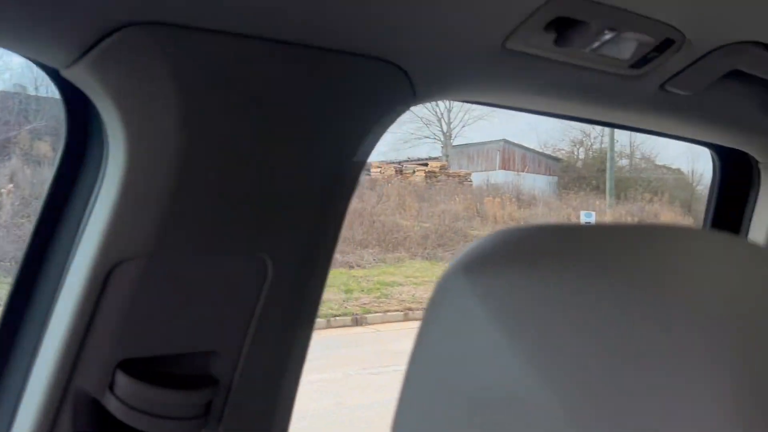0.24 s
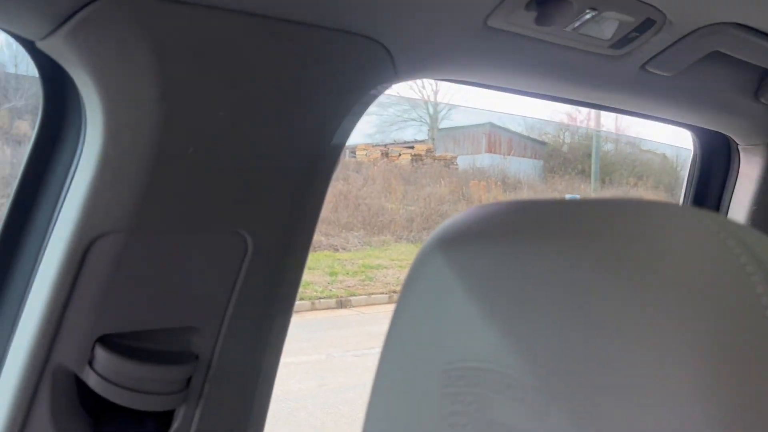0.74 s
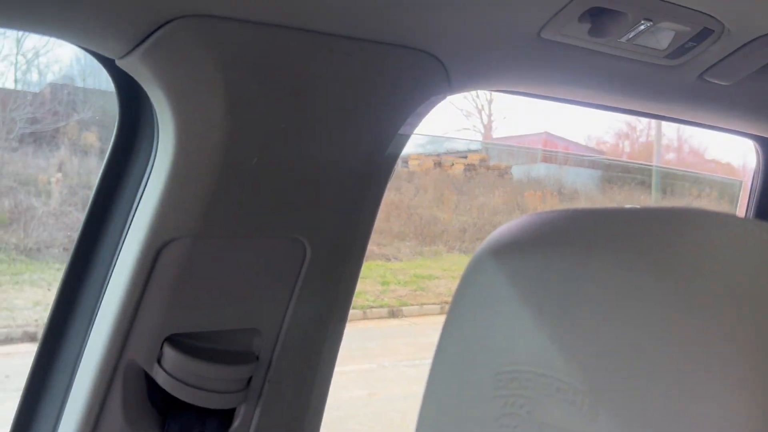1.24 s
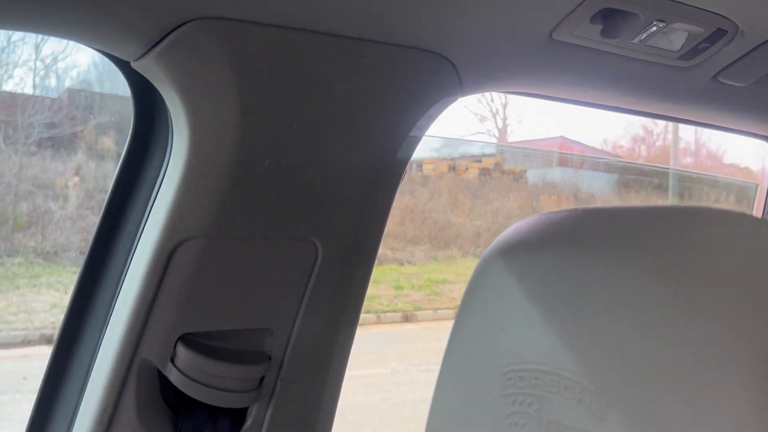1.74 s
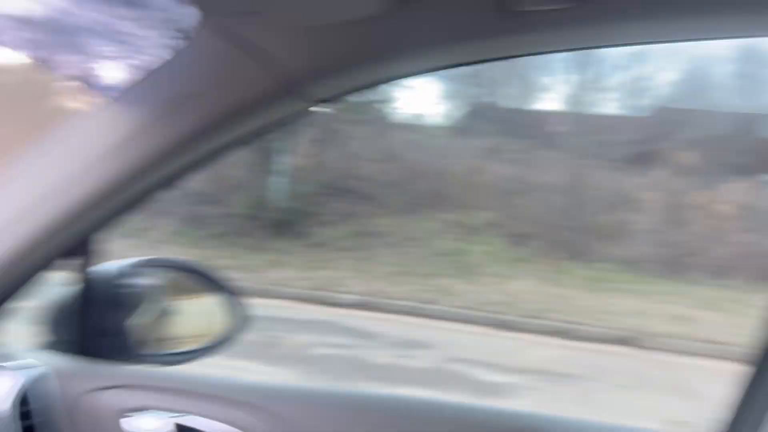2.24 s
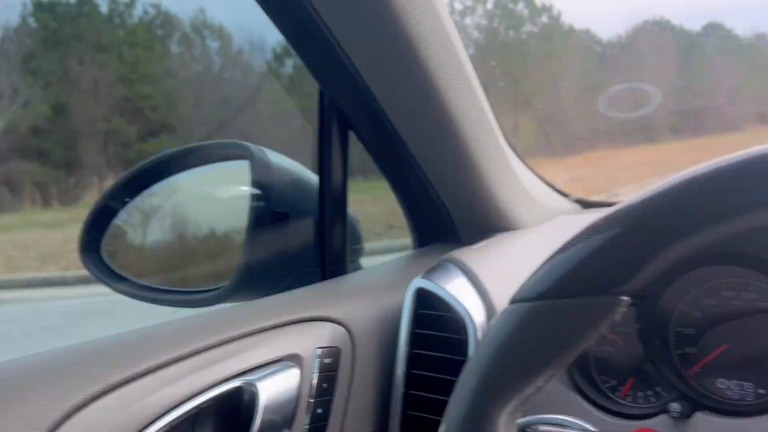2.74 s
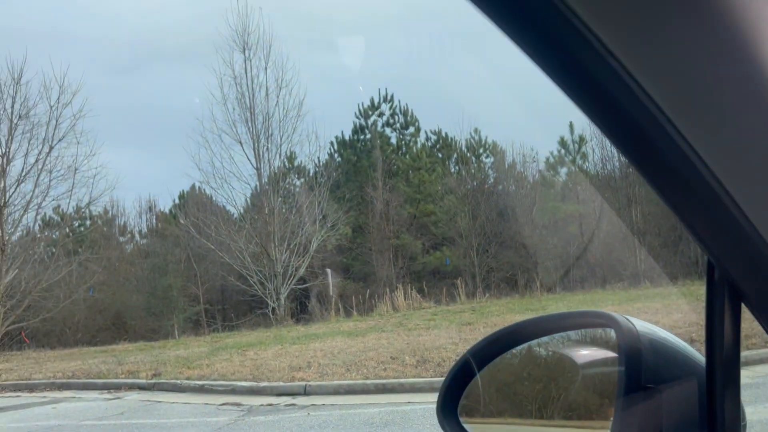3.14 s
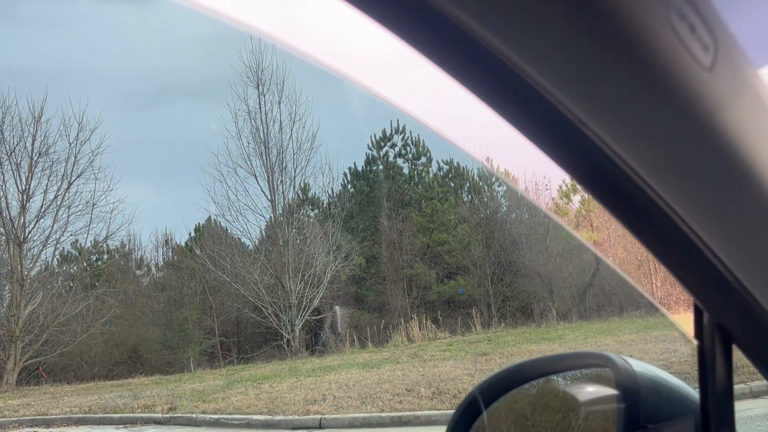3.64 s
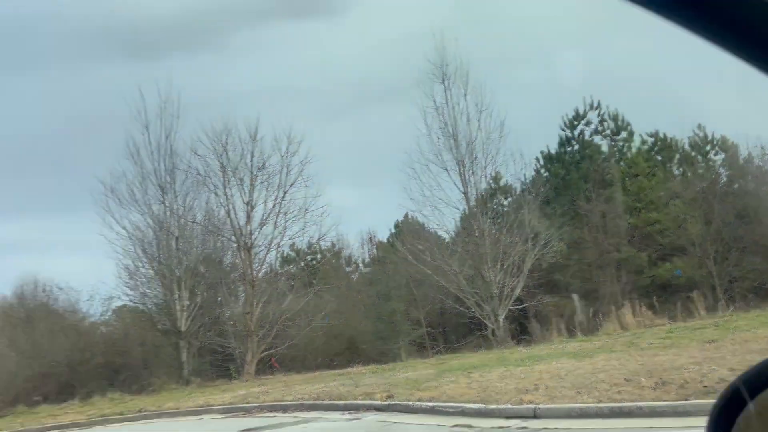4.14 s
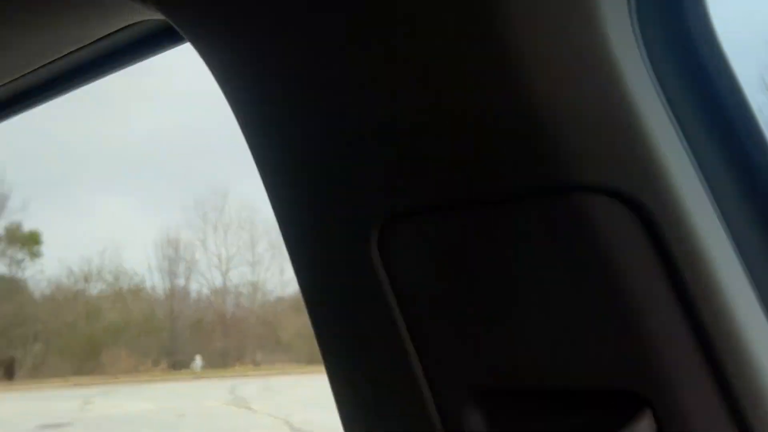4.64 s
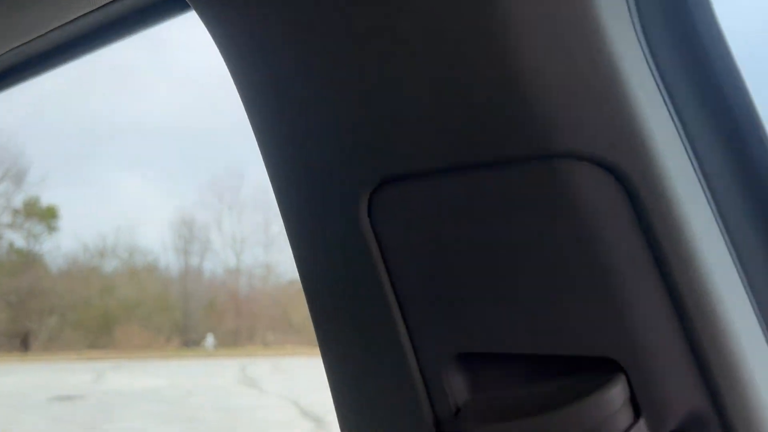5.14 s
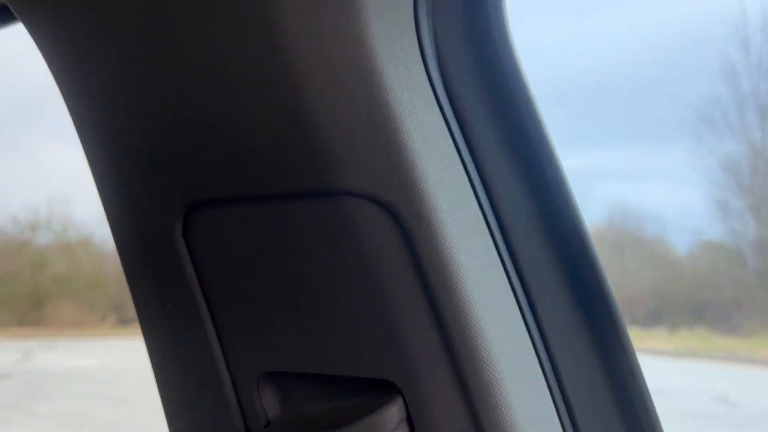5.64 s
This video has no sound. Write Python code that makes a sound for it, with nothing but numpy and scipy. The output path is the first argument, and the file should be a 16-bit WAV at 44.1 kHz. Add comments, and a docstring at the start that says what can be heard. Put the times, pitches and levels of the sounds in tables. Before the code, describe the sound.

Short motor whines of power windows, glass rubbing in seals, thumping door panels and crisp plastic clicks in a softly humming, close car cabin.

```python
"""Inside a parked, idling car the electric windows run in five short bursts, three at the back, then two at the front.
Each burst is a motor whine made of sine waves, under the noise hiss of glass sliding in its seals.
The doors knock and crack, and rocker switches click: short noise bursts mixed with dying sine waves.
Behind them are wavering engine tones, low rumble, faint air and clothes rubbing as a person shifts in the seat.
Gliding tones add thin whistles, squeaks and creaks; bands of grainy noise add rustles and breathy hisses."""
import sys
import numpy as np
from scipy import signal
from scipy.fft import rfft, irfft, next_fast_len
from scipy.io import wavfile
from scipy.ndimage import uniform_filter1d

SR = 44100
rng = np.random.default_rng(int(sys.argv[2]) if len(sys.argv) > 2 else 0)


def inscribe(sig):
    """Save sig as 16-bit PCM at rate SR to the path in sys.argv[1].

    A 1-D sig is mono; a 2-D sig holds one channel per row.
    Samples are clipped to [-1, 1] before scaling.
    """
    pcm = np.round(np.clip(np.atleast_2d(sig).T, -1, 1) * 32767)
    wavfile.write(sys.argv[1], SR, pcm.astype(np.int16))


N = 259308
TIME = np.arange(N) / SR  # seconds, whole scene
RING = np.arange(16384) / SR  # seconds, one hit
# likeness of left and right channel by pitch: pitch_hz, likeness (1 = the same)
CHANNEL_LIKENESS = [(60, .99), (130, .96), (300, .78), (650, .2), (1400, .12), (3100, .28), (6800, .3),
                    (9000, .75), (10200, .9), (13000, .5), (16000, .15)]
# phase of right against left, opposed near 10 kHz: pitch_hz, phase_radians
CHANNEL_PHASE = [(60, 0), (6500, 0), (9200, 2.2), (10200, np.pi), (11000, 5), (12200, 2 * np.pi),
                 (16000, 7)]


def gain_of(db):
    """Decibels to amplitude."""
    return 10 ** (np.asarray(db) / 20)


def evened(x):
    """Scales to rms 1."""
    return x / np.sqrt(np.mean(x ** 2) + 1e-20)


def struck(x):
    """Scales a hit to rms 1 over its first 20 ms."""
    return x / np.sqrt(np.mean(x[..., :SR // 50] ** 2) + 1e-20)


def read(points, hz):
    """Reads a table on a log-frequency axis."""
    f, value = np.transpose(points)
    return np.interp(np.log(hz + 1), np.log(f + 1), value)


def follow(rows):
    """A time curve at every sample."""
    return np.interp(TIME, *np.transpose(rows))


def add(mix, s, sound):
    """Adds a sound at time s."""
    part = mix[:, max(round(s * SR), 0):][:, :sound.shape[-1]]
    part += sound[..., :part.shape[-1]]


def wander(rate_hz):
    """Random wavering of rms 1, mostly slower than the given rate."""
    hz = np.fft.rfftfreq(N, 1 / SR)
    spectrum = rfft(rng.standard_normal(N)) * np.exp(-(hz / rate_hz) ** 2)
    return evened(irfft(spectrum, N))


def gate(start, end, fade):
    """On between two times, with short fades."""
    return np.clip(np.minimum(TIME - start, end - TIME) / fade + .5, 0, 1)


def arch(middle, length):
    """One smooth rise and fall."""
    return np.cos(np.pi * np.clip((TIME - middle) / length, -.5, .5))


def swells(rows):
    """Amplitude of a series of movements, each one arch."""
    return sum(gain_of(db) * arch(middle, length) for middle, length, db in rows)


def noise(spectrum, size=N):
    """Coloured noise in two channels, whose likeness and phase depend on the pitch."""
    length = next_fast_len(size)
    hz = np.fft.rfftfreq(length, 1 / SR)
    left, other = rfft(rng.standard_normal((2, length)))
    same = np.clip(read(CHANNEL_LIKENESS, hz), -1, 1)
    right = same * left + np.sqrt(1 - same ** 2) * other
    right = right * np.exp(1j * read(CHANNEL_PHASE, hz))
    coloured = np.array([left, right]) * gain_of(read(spectrum, hz))
    return evened(irfft(coloured, length)[:, :size])


def dying(t60):
    """Exponential decay that falls by 60 dB in t60 seconds."""
    return np.exp(-np.log(1000) * RING / max(t60, 1e-3))


def partial(hz):
    """A sine with a different phase in the two channels, partly by chance."""
    spread = np.arccos(np.clip(read(CHANNEL_LIKENESS, hz), -1, 1))
    apart = spread * rng.uniform(-1.04, 1) + read(CHANNEL_PHASE, hz)
    return np.sin(2 * np.pi * hz * RING + np.array([[0], [apart]]))


def mode(hz, t60):
    """The one mode (ringing tone) that a blow excites most."""
    return struck(dying(t60) * (1 - np.exp(-RING * hz / 2)) * partial(hz))


def ring(modes, detune):
    """Damped modes; each blow lands elsewhere and shifts their pitches a little."""
    out = 0
    for k, (hz, db, t60) in enumerate(modes):
        tone = partial(hz * (1 + detune * rng.standard_normal()))
        out = out + (-1) ** k * gain_of(db) * dying(t60) * (1 - np.exp(-RING * hz * 2)) * tone
    return out


def burst(spectrum, rise, t60, tail_db, tail_t60, chatter_db):
    """Many close modes die together, shaken by small rebounds; then the short tail of the upholstered cabin."""
    rebounds = evened(uniform_filter1d(rng.standard_normal(len(RING)), size=140))
    body = dying(t60) * gain_of(chatter_db * rebounds)
    tail = gain_of(tail_db) * dying(tail_t60)
    shape = (1 - np.exp(-RING / rise)) * (body + tail)
    return struck(noise(spectrum, size=len(RING)) * shape)


def bent(x):
    """Bending waves carry the treble first, so a knock falls quickly in pitch."""
    longest_lag_s, fade_hz = 0.00694, 408  # the lag shrinks as the pitch rises
    hz = np.fft.rfftfreq(len(RING), 1 / SR)
    lag = longest_lag_s * np.exp(-hz / fade_hz)
    return irfft(rfft(x) * np.exp(-2j * np.pi * np.cumsum(lag) * hz[1]), len(RING))


def cabin(rumble_db, jolt_db, air_db, cloth_db, grain_db):
    """Low rumble, faint air, and the grainy rub of clothes on the seat."""
    # rumble of the car and the hand-held microphone: time_s, level_db before rumble_db
    rumble_curve = [(0.0, -40.5), (0.31, -34.5), (0.7, -42.5), (1.33, -47), (1.8, -41), (2.9, -40),
                    (3.24, -35), (3.67, -38.5), (4.21, -34), (4.75, -40.5), (5.32, -48.5), (5.44, -41.5),
                    (5.88, -35)]
    # its colour: pitch_hz, density_db (per Hz)
    rumble_colour = [(15, -53), (28, -12), (40, 10.5), (55, -4.5), (85, -2.5), (130, -5), (200, -19),
                     (300, -31.5), (500, -27), (1000, -60)]
    # the microphone is jolted as it swings round: middle_s, length_s, level_db before jolt_db
    jolts = [(0.42, 0.33, -34), (2.3, 0.13, -30.5), (2.66, 0.29, -28), (3.23, 0.19, -23), (4.38, 0.36, -36),
             (5.25, 0.5, -29.5)]
    # clothes and seat rubbing: middle_s, length_s, level_db before cloth_db
    shifts = [(2.67, 0.13, -51.5), (3.0, 0.89, -49), (3.68, 0.53, -59), (4.44, 0.58, -52.5),
              (5.15, 0.12, -38), (5.64, 0.22, -44.5), (5.88, 0.17, -37.5)]
    # colours of cloth and air: pitch_hz, density_db (per Hz)
    cloth_colour = [(120, -55.5), (200, 0.5), (366, -11.5), (424, -20), (465, -31), (659, -19), (1650, -25),
                    (8270, -40), (10100, -52), (12200, -46), (16000, -58)]
    air_colour = [(100, -11.5), (170, -1), (300, -5.5), (480, -20.5), (700, -21.5), (900, -22),
                  (1500, -29.5), (2900, -33), (4000, -50), (8000, -47.5), (16000, -137)]
    rumble_level = np.hypot(gain_of(follow(rumble_curve) + rumble_db), gain_of(jolt_db) * swells(jolts))
    rumble = noise(rumble_colour) * rumble_level
    cloth = noise(cloth_colour) * swells(shifts) * gain_of(cloth_db + grain_db * wander(150))
    air = noise(air_colour) * gain_of(-63.5 + air_db)
    return rumble + cloth + air


def idle(drone_db, drift, low_share, drone_share, octave_share):
    """Steady, slightly wavering engine tones that swell as the microphone moves about the cabin."""
    # idling engine: pitch_hz, level_db (rms, before the swells and drone_db)
    engine_tones = [(38.5, -51.5), (80.7, -74.5), (145.3, -45), (290.7, -56.5)]
    # standing waves met on the way (only changes around the mean count): time_s, drone_db, octave_db
    standing_waves = [(0.0, -49, -58.5), (0.33, -46.5, -58), (1.0, -45, -57.5), (1.85, -45, -56.5),
                      (2.289, -48, -56.5), (2.64, -44.5, -43.5), (3.16, -37, -69), (4.09, -45.5, -52),
                      (4.42, -42.5, -59), (4.81, -50, -57), (5.65, -45, -54.5), (5.88, -51, -55)]
    s, drone, octave = np.transpose(standing_waves)
    places = [(drone, low_share), (drone, low_share), (drone, drone_share), (octave, octave_share)]
    tones = np.zeros(N)
    for (hz, db), (place_db, share) in zip(engine_tones, places):
        swell_db = share * np.interp(TIME, s, place_db - place_db.mean()) + 1.2 * wander(4)
        pitch = hz * (1 + drift * wander(5.01))
        tones += gain_of(db + swell_db) * np.sin(2 * np.pi * np.cumsum(pitch) / SR)
    return np.sqrt(2) * tones * gain_of(drone_db)  # root 2 turns rms into sine peak


def gliding_tones(level_db):
    """Brief gliding tones with a ragged pitch: thin breathy whistles, squeaks and low creaks."""
    # middle_s, length_s, pitch_hz, glide (share of pitch), level_db before the layer gain,
    # roughness (share of pitch)
    tone_rows = [(1.583, 0.08, 2330, 0.06, -55, 0.05), (1.575, 0.115, 3650, 0.09, -69, 0.045),
                 (1.712, 0.19, 2600, -0.022, -68, 0.028), (2.68, 0.1, 450, 0.045, -45.5, 0.012),
                 (3.45, 0.044, 2720, -0.11, -39, 0.084), (3.484, 0.039, 1435, 0.029, -42.5, 0.024),
                 (3.725, 0.092, 968, -0.17, -53, 0.11), (5.429, 0.1, 289.3, 0.15, -45, 0.058),
                 (5.6, 0.039, 354.3, -0.14, -39, 0.036), (5.668, 0.21, 363, -0.034, -46.5, 0.07),
                 (5.668, 0.11, 170, 0.27, -28.5, 0.03), (5.57, 0.162, 1300, 0.1, -64, 0.04),
                 (5.62, 0.14, 1850, -0.083, -65, 0.04)]
    out = np.zeros(N)
    for middle, length, hz, glide, db, rough in tone_rows:
        slide = glide * np.clip((TIME - middle) / length, -.5, .5)
        pitch = hz * (1 + slide + rough * wander(hz / 4))
        level = arch(middle, length) * gain_of(db + 0.61 * wander(90))
        out += level * np.sin(2 * np.pi * np.cumsum(pitch) / SR)
    return gain_of(level_db) * out


def rustles(level_db, grain_db):
    """Dry rustles and faint breathy hisses: grainy noise in bands of different pitch and width."""
    # middle_s, length_s, centre_hz, half_width_octaves, level_db before the layer gain
    rustle_rows = [(0.384, 0.31, 3480, 0.63, -54.5), (1.042, 0.13, 4430, 0.45, -66),
                   (1.45, 0.11, 5260, 0.5, -66.5), (1.642, 0.26, 2270, 0.12, -59.5),
                   (1.879, 0.14, 2480, 1, -54), (3.051, 0.034, 2000, 0.98, -40),
                   (3.84, 0.1, 2480, 0.64, -51), (4.169, 0.085, 1650, 0.79, -41),
                   (5.09, 0.06, 2580, 0.25, -61), (5.253, 0.13, 2190, 0.65, -58),
                   (5.49, 0.17, 1900, 0.24, -67), (5.14, 0.12, 1400, 0.4, -50),
                   (5.55, 0.15, 970, 0.92, -53.5), (5.567, 0.25, 430, 0.3, -50.5)]
    out = np.zeros((2, N))
    for middle, length, hz, octaves, db in rustle_rows:
        band = [(hz * 2 ** (k * octaves), -7 * abs(k) ** 1.3) for k in range(-5, 6)]
        out += noise(band) * arch(middle, length) * gain_of(db)
    return out * gain_of(level_db + grain_db * wander(250))


def cracks(level_db, ringing):
    """Door trim lets go with single dry cracks as the load comes on or off, each with a short ring."""
    # start_s, centre_hz, level_db before the layer gain
    crack_rows = [(0.278, 3000, -47), (0.284, 2290, -44), (0.359, 2500, -46), (0.402, 2610, -43),
                  (0.427, 1550, -37.5), (1.805, 2930, -54), (1.834, 1980, -49), (1.861, 3020, -46),
                  (1.89, 2900, -45), (1.896, 2650, -46.5), (3.054, 2574, -31), (3.153, 2740, -39),
                  (3.815, 2780, -39), (3.839, 3080, -37.5), (3.873, 2170, -38), (3.888, 2388, -45),
                  (4.277, 1530, -36), (4.285, 2710, -37.5), (4.395, 2390, -48), (5.144, 1420, -40.5),
                  (5.712, 3980, -59)]
    # colour of a crack: multiple of the centre, density_db (per Hz)
    crack_band = [(0.15, -30), (0.4, -11), (0.75, -2), (1, -1), (1.3, -13.5), (2.2, -22.5), (4, -37.5),
                  (6, -51.5)]
    out = np.zeros((2, N))
    for s, hz, db in crack_rows:
        band = [(hz * ratio, band_db) for ratio, band_db in crack_band]
        crack = burst(band, rise=0.00037, t60=0.024, tail_db=-20, tail_t60=0.067, chatter_db=1.5)
        add(out, s, gain_of(db + level_db) * struck(crack + ringing * mode(hz, t60=0.042)))
    return out


def latch():
    """A small steel catch snaps after the front glass stops and rings briefly in clear bands."""
    # its ringing tones: pitch_hz, level_db (relative), t60_s
    catch_modes = [(1390, 1, 0.044), (1664, 9, 0.04), (1754, 6, 0.061), (2050, 4.5, 0.058),
                   (2470, -1, 0.057), (3180, -9.5, 0.07), (3910, -3.5, 0.07), (4230, 0.5, 0.091),
                   (4890, 1.5, 0.075), (4950, 3.5, 0.09), (5850, -5.5, 0.12), (6150, -8.5, 0.12),
                   (8200, -2, 0.08), (8300, 0, 0.1)]
    start_s, level_db = 4.344, -34
    out = np.zeros((2, N))
    add(out, start_s, gain_of(level_db) * struck(ring(catch_modes, detune=0.005)))
    return out


def clicks(snap_db, body_db, fizz_db, modal, leading, springy):
    """A spring snaps over and rings its plastic housing."""
    # switch clicks: start_s, snap_db, hollow_body_db (both before the layer gains), strongest_body_hz
    click_rows = [(0.331, -46.5, -41.5, 764), (0.78, -46.5, -47, 760), (1.1707, -53, -44, 1025),
                  (1.508, -65, -49.5, 1112), (1.518, -56, -57, 2090), (1.6456, -48, -39.5, 1033),
                  (1.805, -48, -44.5, 1020), (2.801, -45.5, -46.5, 1400), (2.8258, -47, -45, 1270),
                  (2.8414, -43, -42.5, 1110), (2.8718, -28.5, -31, 916), (2.962, -43, -44.5, 960),
                  (3.065, -47, -42, 1440), (3.5361, -29.5, -28, 1180), (3.5805, -46, -39, 976),
                  (3.6042, -27, -26, 1460), (3.653, -55, -38.5, 1120), (3.714, -50.5, -38, 976),
                  (3.797, -47, -41, 1065), (4.3445, -24, -33, 1674), (4.4367, -53, -45, 987),
                  (4.7026, -36.5, -37, 993), (5.102, -43, -39, 1150), (5.2779, -35, -34.5, 977),
                  (5.3098, -40.5, -39, 980), (5.3366, -41.5, -39.5, 1010), (5.3759, -41, -41.5, 1320),
                  (5.3867, -33, -35, 1040), (5.7788, -44.5, -47, 970)]
    # ringing of spring and housing: pitch_hz, level_db (relative), t60_s
    spring_modes = [(3960, 5, 0.036), (4530, -1.5, 0.035), (4700, 13, 0.023), (4980, 5.5, 0.076),
                    (5650, -12, 0.12), (6240, -10, 0.13), (7260, -0.5, 0.046), (8520, 5, 0.06)]
    housing_modes = [(880, 4, 0.07), (1039, 8.5, 0.037), (1237, 3.5, 0.041), (1470, -24, 0.16),
                     (1740, -30, 0.02), (2020, 2.5, 0.058), (2470, -3, 0.057), (2720, -7, 0.035)]
    # colours of the snap, the hollow body and the top fizz: pitch_hz, density_db (per Hz)
    snap_colour = [(1500, -38), (3000, -6.5), (4200, -7), (5000, -4), (6300, -9), (7300, -7.5),
                   (8400, -4.5), (10000, -20), (13000, -20)]
    hollow_colour = [(300, 5.5), (700, -1.5), (1100, -3.5), (2000, -5), (2800, -9), (4000, -13.5),
                     (8000, -56)]
    fizz_colour = [(6000, -43), (9500, 8), (11500, 0), (14000, -5), (16000, -18)]
    fizz_growth = 1.33  # dB of fizz for each dB of snap: harder clicks are brighter
    out = np.zeros((2, N))
    for s, snap, body, body_hz in click_rows:
        crack = burst(snap_colour, rise=0.00076, t60=0.015, tail_db=-16, tail_t60=0.11, chatter_db=-6.5)
        spring = struck(crack + springy * struck(ring(spring_modes, detune=0.013)))
        hollow = burst(hollow_colour, rise=0.0013, t60=0.081, tail_db=-34, tail_t60=0.13, chatter_db=-1)
        modes = struck(ring(housing_modes, detune=0.015))
        housing = struck(hollow + modal * modes + leading * mode(body_hz, t60=0.039))
        fizz = burst(fizz_colour, rise=.0003, t60=.018, tail_db=-15, tail_t60=.1, chatter_db=2)
        add(out, s, gain_of(snap + snap_db) * spring)
        add(out, s, gain_of(body + body_db) * housing)
        add(out, s, gain_of(fizz_growth * snap + fizz_db) * fizz)
    return out


def knocks(clunk_db, tap_db, boom_db, rattle_db):
    """Glass takes up slack or hits its stop: trim taps, panel clunks, door booms, loose parts rattle."""
    # blows in the doors, levels before the layer gains: start_s, clunk_db, strongest_panel_hz,
    # tap_db, tap_hz, boom_db, boom_hz, rattle_db, length_factor
    blows = [(0.278, -15.5, 349, -20.5, 960, -14, 112.4, -41, 0.93),
             (0.29, -22, 233, -32, 1310, -16, 182.7, -50, 0.49),
             (0.345, -33, 330, -45, 1000, -26.5, 76, -43, 0.56),
             (0.362, -18.5, 348, -23.5, 762, -23, 72.5, -44.5, 0.46),
             (0.405, -27, 330, -36, 1040, -48, 73, -45, 0.32),
             (0.417, -26, 343, -33.5, 1310, -32, 114, -38, 0.89),
             (0.963, -39, 353, -39, 1220, -40.5, 144, -53, 1.3),
             (1.822, -32.5, 368, -38.5, 1026, -39, 119, -48, 0.6),
             (1.85, -22.5, 383, -25, 862, -42, 147, -50, 0.18),
             (1.886, -32, 330, -41, 690, -40, 125, -50, 0.7),
             (1.903, -38, 438, -40, 1120, -47, 123, -46, 1.1), (1.932, -45, 342, -42, 750, -32, 98, -49, 1),
             (2.594, -38.5, 302, -58, 895, -24.5, 129, -61, 0.73),
             (2.868, -30.5, 271, -31.5, 992, -28, 80, -54, 0.97),
             (3.036, -47, 284, -30, 980, -50, 120, -52, 0.4),
             (3.043, -22, 267, -20.5, 941, -24.5, 235, -33.5, 0.46),
             (3.053, -19.5, 268, -18.5, 922, -25, 96, -28, 0.99),
             (3.106, -39, 302, -30.5, 976, -38, 120, -48, 0.34),
             (3.123, -15, 299, -23, 828, -20, 169, -37.5, 0.66),
             (3.152, -32, 278, -40, 1090, -28, 118, -39, 0.95),
             (3.168, -25.5, 281, -28, 1060, -23, 81.2, -37, 1.3),
             (3.19, -29, 248, -41, 910, -26, 116, -37, 1.17),
             (3.458, -23.5, 299, -29, 1120, -33, 191, -42, 0.4),
             (3.476, -35.5, 330, -48, 1490, -30, 128, -38, 0.28),
             (3.672, -41, 280, -58, 1010, -27, 100, -71, 0.21),
             (3.727, -40, 278, -56, 990, -32.5, 181, -66, 0.71),
             (3.813, -31.5, 412, -37, 1060, -49, 91, -45, 0.23),
             (3.8296, -23, 450, -22.5, 1150, -27.5, 202, -47, 0.3),
             (3.839, -23.5, 268, -39, 805, -36, 188, -39, 0.42),
             (3.868, -19.5, 264, -30, 1113, -25, 173, -39, 0.39),
             (3.882, -30.5, 500, -38, 890, -42, 150, -48, 0.62),
             (4.276, -14, 214, -18.5, 943, -7.5, 126.7, -34, 0.67),
             (4.283, -19.5, 196, -47, 1030, -18.5, 183, -51, 0.38),
             (4.31, -37, 268, -46, 940, -29, 163, -58, 0.31),
             (4.331, -32.5, 330, -50, 990, -34, 130, -43, 0.35),
             (4.343, -29.5, 270, -44, 1000, -23, 101, -32, 0.63),
             (5.11, -20, 266, -29.5, 1193, -32, 142.6, -45, 1),
             (5.128, -36, 310, -40, 810, -19.5, 82.8, -55, 0.7),
             (5.179, -23, 454, -28, 716, -36, 142, -45, 0.7),
             (5.388, -29, 273.5, -59, 1040, -48, 111, -37, 0.87),
             (5.785, -35, 291, -41, 980, -35, 87, -42.5, 0.62),
             (5.841, -27, 259, -27, 1385, -30.5, 80.6, -38, 0.82)]
    # ringing of door panel, cabin air and loose plastic: pitch_hz, level_db (relative), t60_s
    panel_modes = [(273, 10.5, 0.091), (341, 3.5, 0.093), (416, -13, 0.064), (474.6, 0.5, 0.11),
                   (637, 7.5, 0.029), (690, -15.5, 0.1), (880, -6.5, 0.059), (1026, -7, 0.14),
                   (1220, -17, 0.046)]
    air_modes = [(61.5, -11.5, 0.49), (82.9, -8.5, 0.26), (105, -41, 0.089), (176.6, -8.5, 0.088)]
    loose_modes = [(1498, 8.5, 0.051), (1813, -5, 0.084), (2115, -3.5, 0.09), (2387, -1.5, 0.056),
                   (2614, 1, 0.055), (3150, -4, 0.04)]
    # dense ringing of the trim and of loose parts: pitch_hz, density_db (per Hz)
    clunk_colour = [(120, -34), (240, 2), (400, 5), (650, -9.5), (950, -11), (1400, -16), (2500, -67),
                    (5000, -69.5)]
    rattle_colour = [(600, -21), (1200, 9), (1500, 1.5), (2000, 0), (2700, 0.5), (3600, -16.5), (6000, -12),
                     (9000, -15), (16000, -68)]
    swell_s = 0.019  # a boom of length factor 1 peaks this late
    skin_ratio, skin_db = 1.599, -7  # the door's outer skin has a second drum mode above every boom
    out = np.zeros((2, N))
    for s, clunk, panel_hz, tap, tap_hz, boom, hz, rattle, stretch in blows:
        u = RING / max(swell_s * stretch, .003)
        skin = gain_of(skin_db) * np.sin(2 * np.pi * skin_ratio * hz * RING)
        drum = np.sin(2 * np.pi * hz * RING) + skin
        flex = (u * np.exp(1 - u)) ** 2 * drum + ring(air_modes, detune=0.059)

        dense = burst(clunk_colour, rise=0.00028, t60=0.078 * stretch,
                      tail_db=3.0, tail_t60=0.16, chatter_db=-5.5)
        modes = struck(ring(panel_modes, detune=0.031))
        strongest = mode(panel_hz, t60=0.092 * stretch)
        panel = struck(bent(.7 * dense + .55 * modes + strongest))

        lower = 0.73 * mode(0.773 * tap_hz, t60=0.032)
        upper = 0.19 * mode(1.25 * tap_hz, t60=0.027)
        trim = struck(mode(tap_hz, t60=0.048) + lower + upper)

        shaken = burst(rattle_colour, rise=0.0012, t60=0.11 * stretch,
                       tail_db=-11.5, tail_t60=0.23, chatter_db=4.0)
        loose = struck(shaken + .8 * struck(ring(loose_modes, detune=0.03)))

        add(out, s, gain_of(boom + boom_db) * flex)
        add(out, s, gain_of(clunk + clunk_db) * panel)
        add(out, s, gain_of(tap + tap_db) * trim)
        add(out, s, gain_of(rattle + rattle_db) * loose)
    return out


def friction(runs, fade):
    """The glass breaks free, then drags steadily more or less as it travels."""
    grip_db, grip_s = -0.5, 0.12  # seals grip harder at first: slightly quieter until the glass is free
    out = np.zeros(N)
    for start, end, db, change_db, _ in runs:
        travel = np.clip((TIME - start) / (end - start), 0, 1)
        held_db = grip_db * np.exp(-np.maximum(TIME - start, 0) / grip_s)
        out += gate(start, end, fade) * gain_of(db + change_db * (travel - .5) + held_db)
    return out


def sliding(spectrum, speed, chop, stick_db, grain_db):
    """Glass hisses in its seals, pushed once a turn by the worm gear; the rubber grabs in grains."""
    # the part of the hiss made grainy, mostly the middle range: pitch_hz, level_db
    rub_band = [(200, -20), (500, 0), (3000, 0), (6000, -15)]
    angle = 2 * np.pi * np.cumsum(speed) / SR
    hiss = noise(spectrum)
    rub = irfft(rfft(hiss) * gain_of(read(rub_band, np.fft.rfftfreq(N, 1 / SR))), N)
    grains = evened(gain_of(grain_db * wander(140)))
    grainy = hiss + rub * (grains - 1)
    return grainy * (1 + chop * np.cos(angle)) * gain_of(stick_db * wander(19))


def powered(runs, fade):
    """A motor whines evenly for as long as it is switched on."""
    return sum(gain_of(whine_db) * gate(start, end, fade) for start, end, _, _, whine_db in runs)


def whine(door, speed, flutter_db, jitter):
    """Multiples of the shaft speed swell and fade as they glide across the resonances of the door."""
    # strongest on the multiples of the armature slots: order (tones per turn), level_db (relative)
    shaft_orders = [(4, 0), (5, -10), (6, -8), (7, -5), (8, 0), (9, -4), (10, -4), (11, -8), (12, -6),
                    (14, -8), (15, -8), (16, 0), (17, -7), (18, -9), (20, -4), (24, -5), (32, -3)]
    angle = 2 * np.pi * np.cumsum(speed * (1 + jitter * wander(32.6))) / SR
    out = np.zeros((2, N))
    for order, db in shaft_orders:
        channel_phase = rng.uniform(0, 2 * np.pi) + np.array([[0], [rng.normal(0, .5)]])
        swell_db = read(door, order * speed) + flutter_db * wander(8)
        out += gain_of(db + swell_db) * np.sin(order * angle + channel_phase)
    return out


def rear_window(slide_db):
    """The rear motor whines through its door while the glass hisses, in three bursts."""
    # start_s, end_s, sliding_db before slide_db, friction_change_db, whine_db before door and orders
    runs = [(-0.02, 0.32, -50.5, 7, -57.5), (0.41, 0.99, -55, -3, -59), (1.89, 2.61, -56, -2.5, -61.5)]
    # motor speed, sagging under load, one curve a burst: time_s, turns_per_second_hz
    shaft = [
        [(0.0, 82.5), (0.14, 77.94), (0.26, 84.8)],
        [(0.46, 95.8), (0.592, 91.05), (0.68, 94.9), (0.74, 93.9), (0.81, 95), (0.96, 97.3)],
        [(1.94, 81.65), (2.02, 83.16), (2.11, 81.35), (2.154, 82.4), (2.268, 78.3), (2.38, 75.1), (2.46, 79.3),
         (2.52, 78.4), (2.58, 73.7)],
    ]
    # how the door radiates the whine: pitch_hz, level_db
    door = [(300, -8), (375, 5), (435, 3), (480, -5), (560, -6), (620, 2.5), (645, 1), (680, -5), (735, 2),
            (775, -2), (810, -8), (860, -6), (945, 2), (1040, -3), (1130, -3), (1265, -4), (1330, -5),
            (1420, -9), (1500, -9), (2000, -14), (3200, -20)]
    # glass rubbing in its seals: pitch_hz, density_db (per Hz)
    slide_colour = [(180, -16.5), (300, -3.5), (519, -16), (749, -18), (814, -14), (1280, -16),
                    (1690, -21.5), (2790, -17.5), (8220, -26), (9390, -26), (10000, -85), (10700, -38),
                    (11700, -31), (14500, -38), (16000, -56)]
    speed = follow(np.vstack(shaft))
    motor = powered(runs, fade=.027) * whine(door, speed, flutter_db=2.5, jitter=.0018)
    hiss = sliding(slide_colour, speed, chop=0.044, stick_db=1.6, grain_db=1.5)
    return motor + friction(runs, fade=0.039) * gain_of(slide_db) * hiss


def front_window(slide_db):
    """The front window is closer and rougher, mostly hiss, in two bursts."""
    # start_s, end_s, sliding_db before slide_db, friction_change_db, whine_db before door and orders
    runs = [(3.15, 3.505, -51, 1.5, -62), (3.86, 4.29, -54.5, 3, -60.5)]
    # motor speed over both bursts: time_s, turns_per_second_hz
    shaft = [(3.15, 85.3), (3.3, 83.9), (3.42, 85.5), (3.9, 84.1), (4.0, 81.35), (4.09, 84), (4.28, 82.7)]
    # how the door radiates the whine: pitch_hz, level_db
    door = [(320, -2), (680, -9), (820, -2), (960, -4), (1020, 9), (1120, -4), (1325, 3), (1370, -8),
            (1950, -3), (2700, -13)]
    # glass rubbing in its seals: pitch_hz, density_db (per Hz)
    slide_colour = [(120, -51), (200, 0), (259, 4.5), (299, -7), (623, -17.5), (1020, -12.5), (1230, -21),
                    (1300, -42), (1400, -15), (7970, -24), (9060, -20), (9930, -52), (11300, -28.5),
                    (12800, -31), (16000, -43)]
    speed = follow(shaft)
    motor = powered(runs, fade=0.023) * whine(door, speed, flutter_db=3.5, jitter=.004)
    hiss = sliding(slide_colour, speed, chop=0.12, stick_db=1.5, grain_db=1.5)
    return motor + friction(runs, fade=0.033) * gain_of(slide_db) * hiss


def scene():
    """Both windows, their knocks and switches, in the idling car."""
    still = cabin(rumble_db=0.5, jolt_db=-4.5, air_db=10.0, cloth_db=-1.5, grain_db=3.0)
    engine = idle(drone_db=-0.5, drift=0.00422, low_share=0.23, drone_share=1.0, octave_share=0.91)
    small_sounds = gliding_tones(level_db=0.0) + rustles(level_db=-5.5, grain_db=3.0)
    switches = clicks(snap_db=-11.0, body_db=-6.0, fizz_db=-11.0, modal=0.43, leading=0.54, springy=0.5)
    doors = knocks(clunk_db=-8.0, tap_db=-14.0, boom_db=2.0, rattle_db=-9.0)
    doors = doors + cracks(level_db=-7.5, ringing=0.51)
    windows = rear_window(slide_db=1.5) + front_window(slide_db=9.5)
    return still + engine + small_sounds + switches + latch() + doors + windows


def record(dry):
    """The channels differ a little in colour, peaks near full scale are rounded off, then the top is cut."""
    # colour of the two channels: pitch_hz, left_minus_right_db
    balance = [(60, 1.1), (110, 2), (200, 2.5), (380, 2), (700, 0), (1290, -1), (2380, 2.5), (4400, 4.5),
               (8120, 1), (15000, -1.5)]
    ceiling, edge_hz = 0.9, 16000
    tilt_db = read(balance, np.fft.rfftfreq(N, 1 / SR)) / 2
    heard = irfft(rfft(dry) * gain_of([tilt_db, -tilt_db]), N)
    heard = heard / (1 + (heard / ceiling) ** 8) ** (1 / 8)
    low_pass = signal.firwin(511, edge_hz, window=("kaiser", 9), fs=SR)
    return signal.oaconvolve(heard, low_pass[None], "same")


dry = scene()
out = record(dry)
inscribe(out)
```